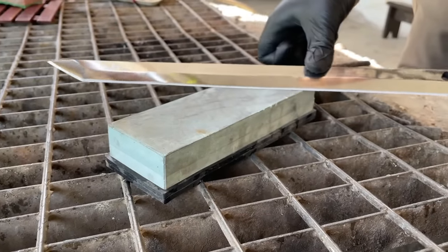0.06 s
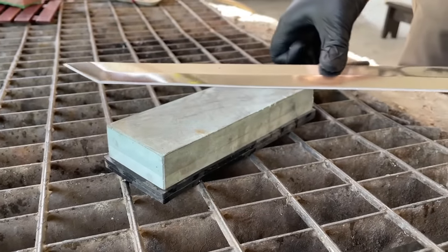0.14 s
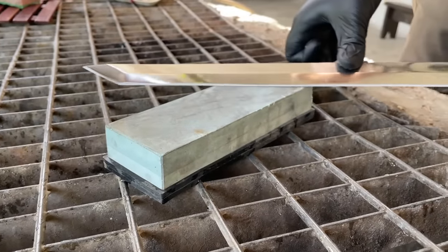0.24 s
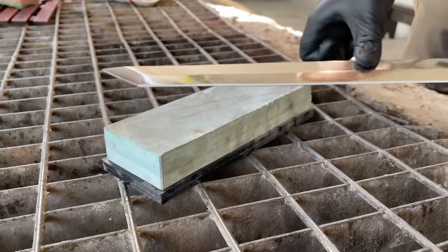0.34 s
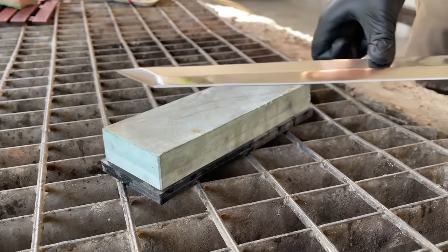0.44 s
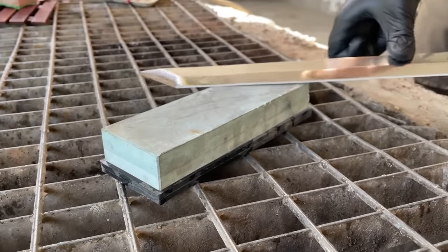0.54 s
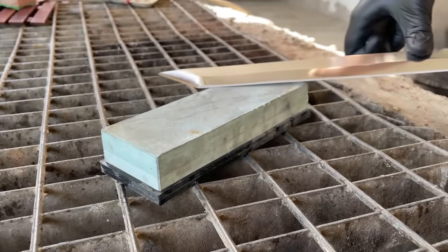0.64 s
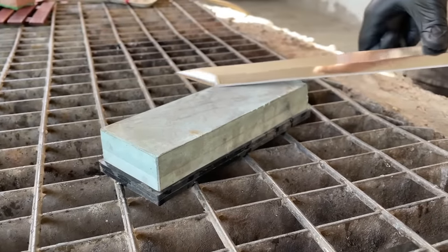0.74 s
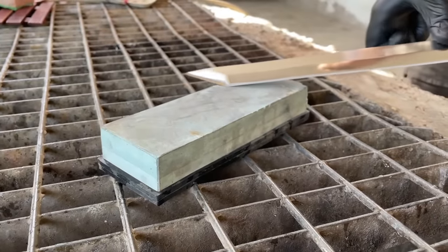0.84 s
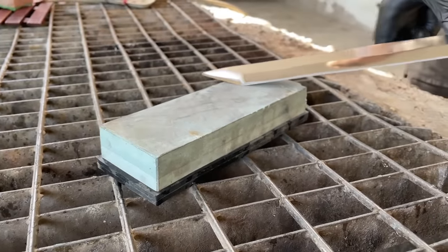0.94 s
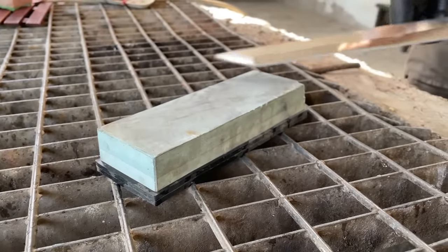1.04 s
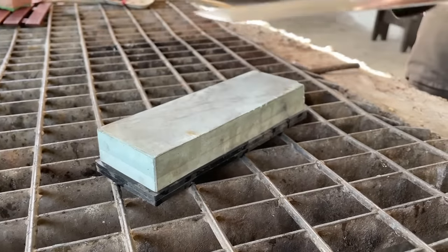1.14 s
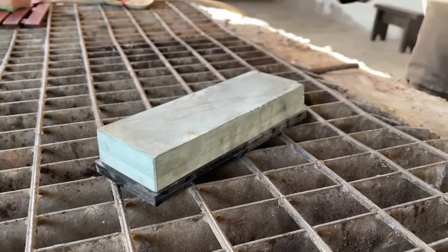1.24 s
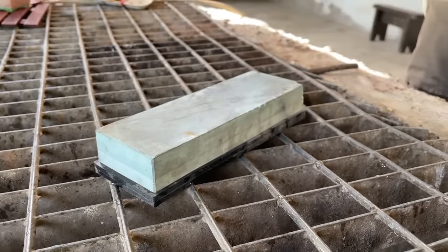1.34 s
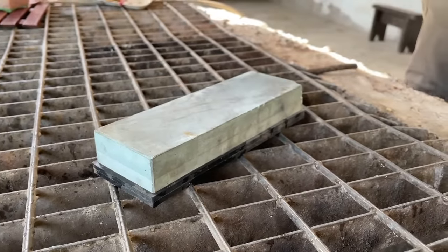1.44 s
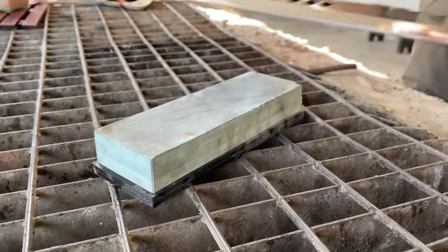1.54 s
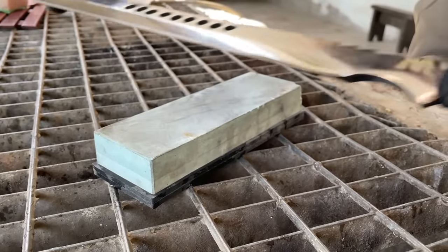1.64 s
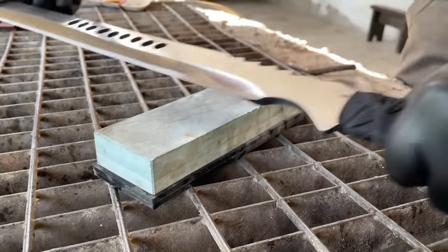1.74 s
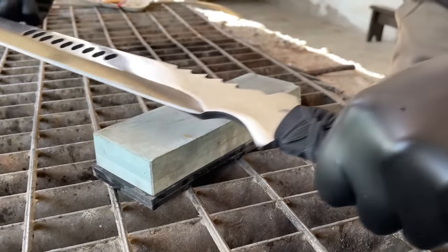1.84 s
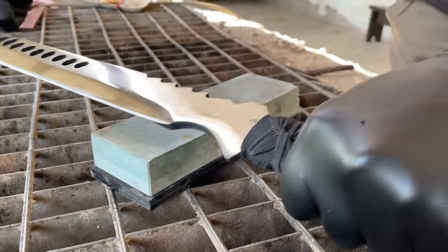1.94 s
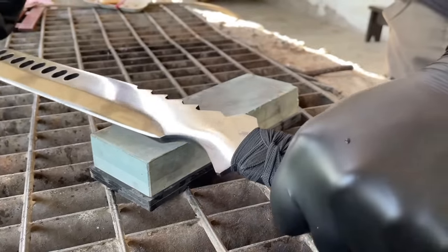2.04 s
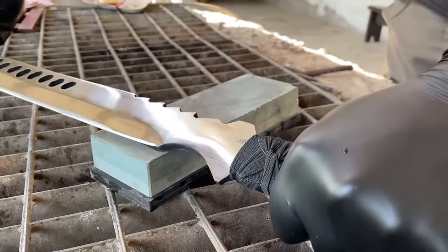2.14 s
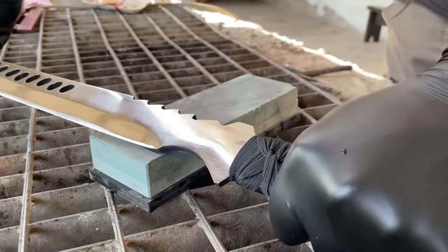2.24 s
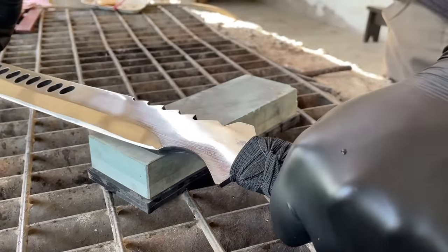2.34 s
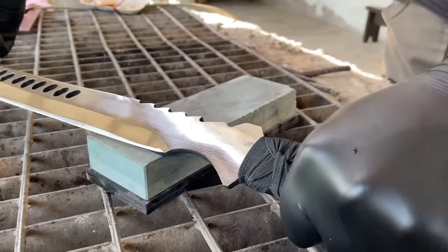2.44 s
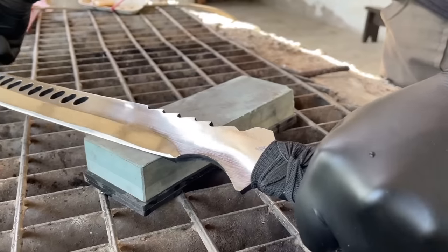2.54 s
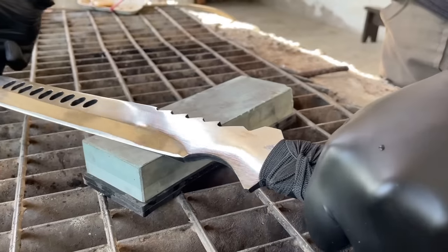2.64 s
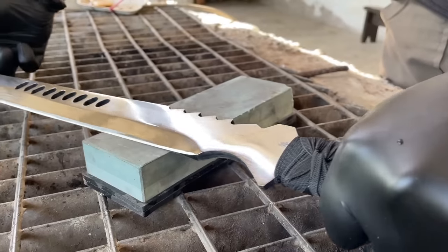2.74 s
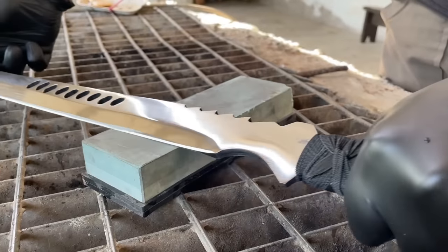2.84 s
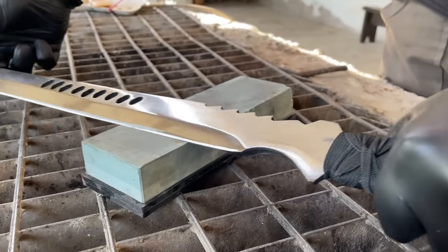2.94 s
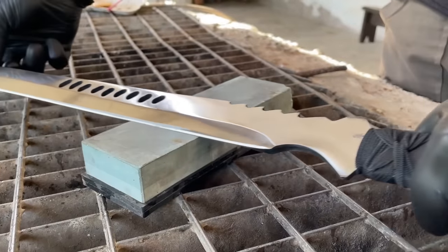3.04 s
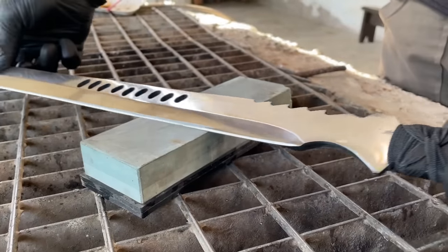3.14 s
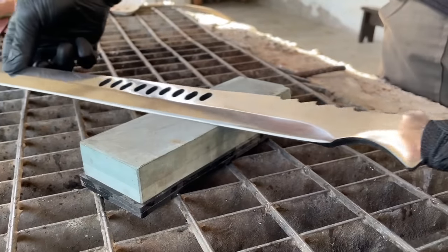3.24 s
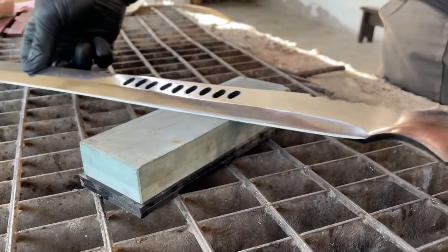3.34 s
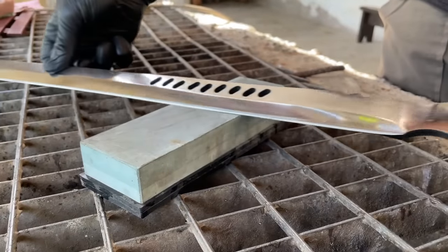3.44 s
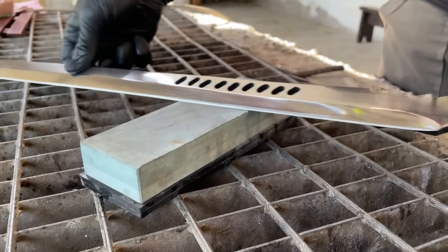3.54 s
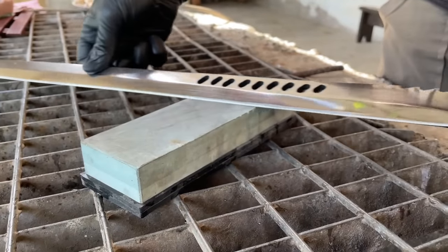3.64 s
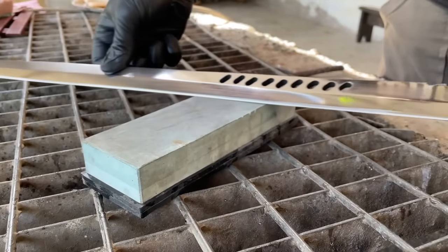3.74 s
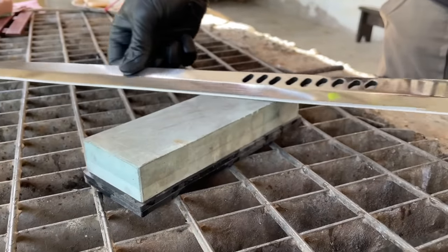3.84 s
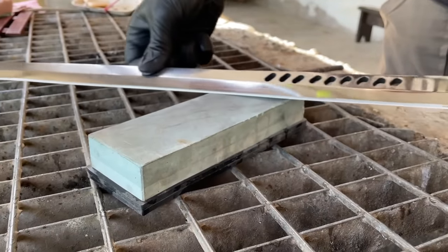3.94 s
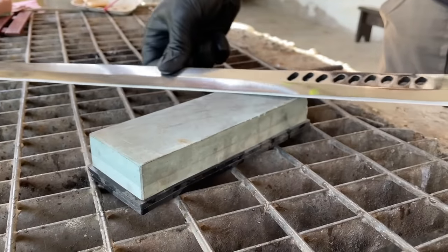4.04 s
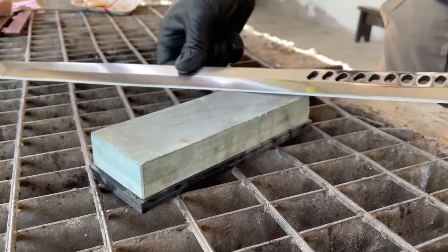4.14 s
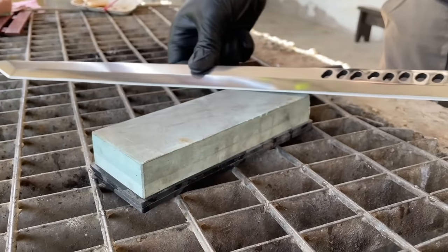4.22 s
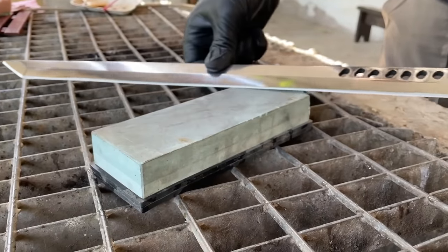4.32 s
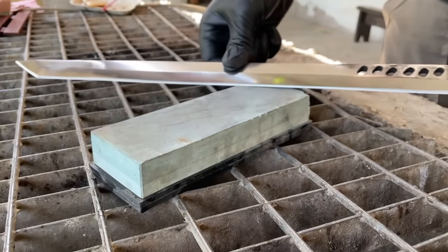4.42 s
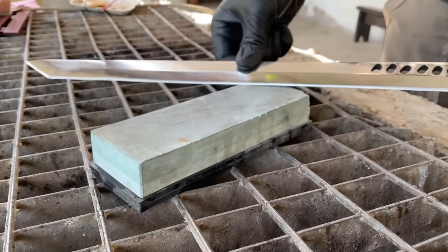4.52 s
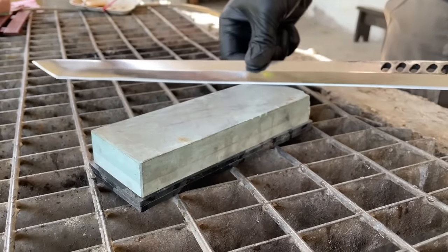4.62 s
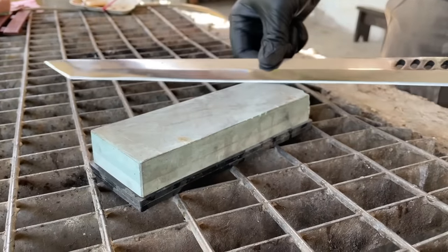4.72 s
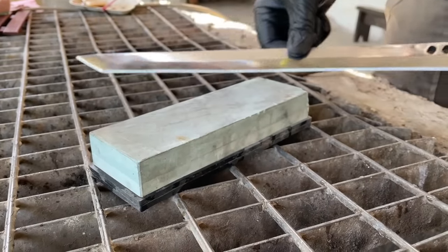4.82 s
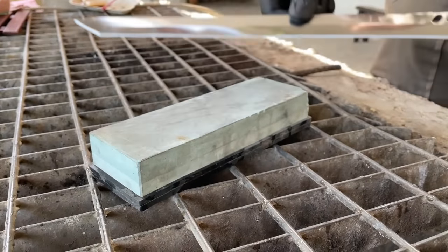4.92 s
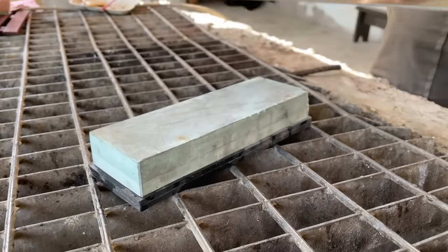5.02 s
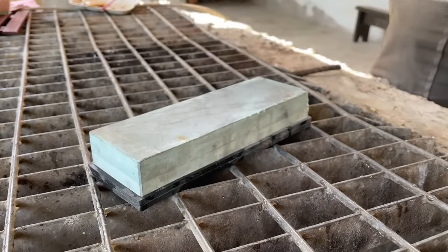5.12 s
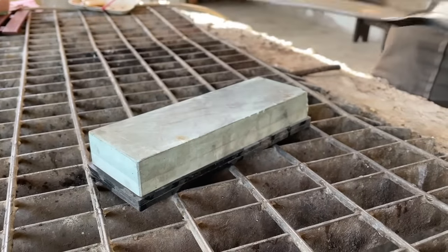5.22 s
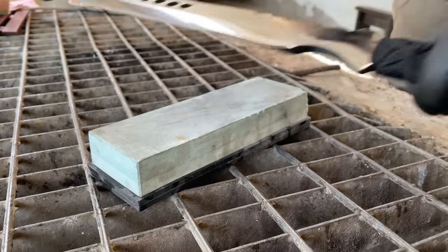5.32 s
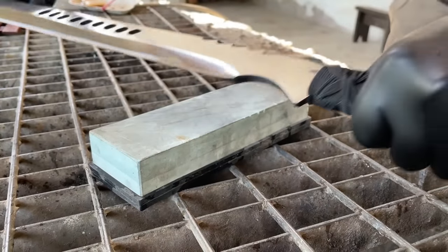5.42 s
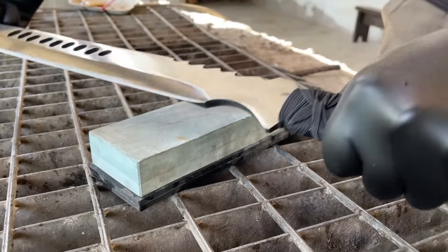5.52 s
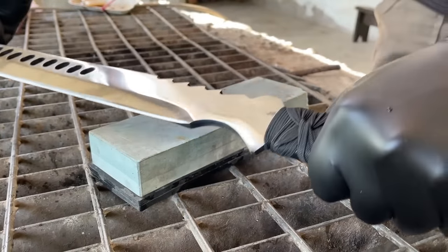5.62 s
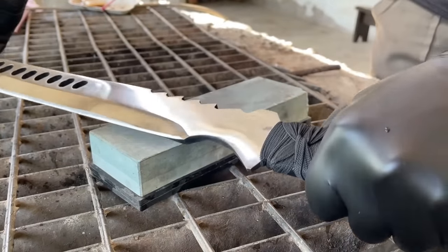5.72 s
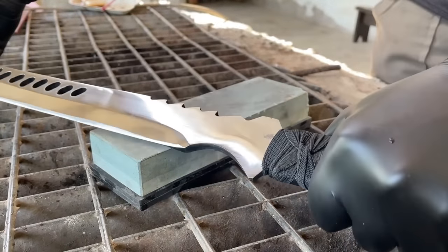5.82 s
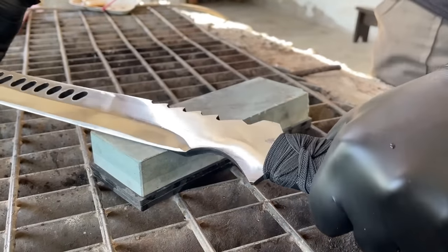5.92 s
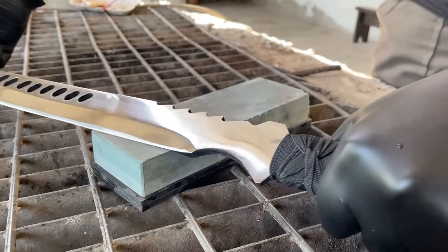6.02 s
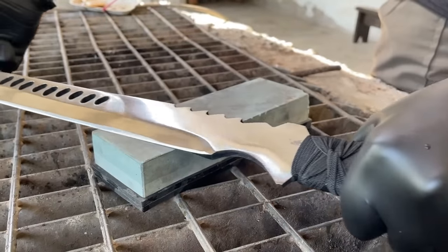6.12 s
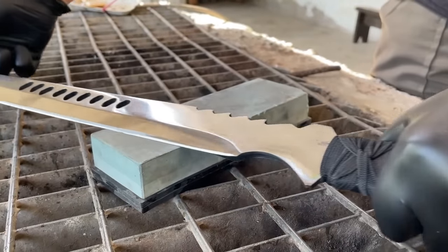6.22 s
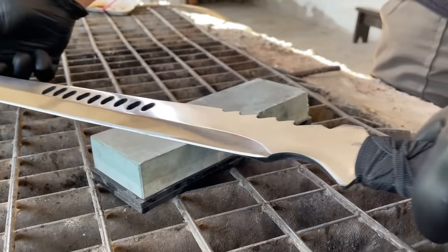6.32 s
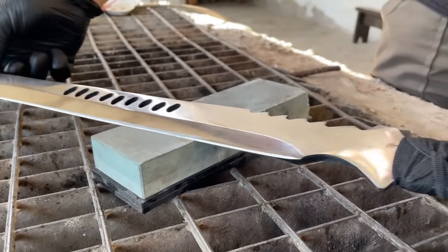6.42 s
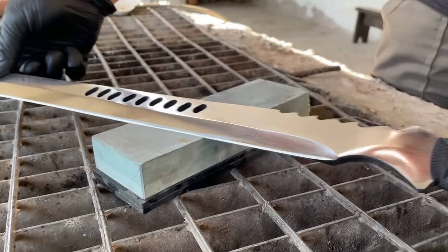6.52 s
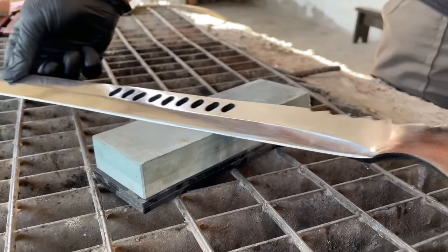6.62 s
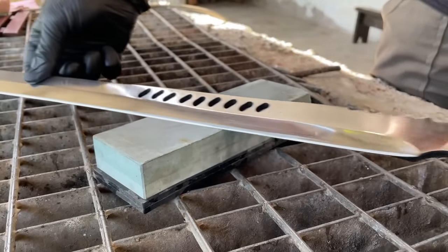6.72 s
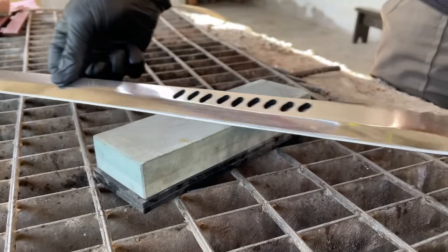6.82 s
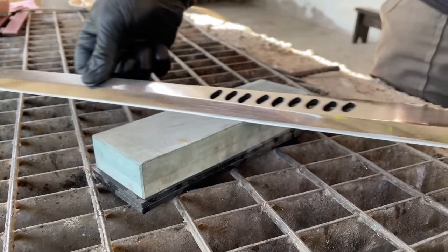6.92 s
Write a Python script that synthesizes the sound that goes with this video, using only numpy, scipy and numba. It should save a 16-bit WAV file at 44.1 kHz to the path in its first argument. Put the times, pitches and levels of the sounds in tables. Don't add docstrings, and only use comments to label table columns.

```python
import sys
import numpy as np
from scipy import signal
from scipy.fft import rfft, irfft, next_fast_len
from scipy.io import wavfile
from scipy.ndimage import uniform_filter1d
from numba import njit

SR = 44100
rng = np.random.default_rng(int(sys.argv[2]) if len(sys.argv) > 2 else 0)


def nominal_scale(level):
    x = np.asarray(level, float) / 20
    return 10 ** x


def pcm_store(signal):
    levels = np.round(np.clip(np.atleast_2d(signal), -1, 1) * 32767)
    wavfile.write(sys.argv[1], SR, levels.astype(np.int16).T)


N = 307377
STEP = 64


def level(x, db):
    return x * nominal_scale(db) / np.sqrt(np.mean(x ** 2))


def on_log(table, hz):
    f, v = np.transpose(table)
    return np.interp(np.log(np.maximum(hz, 1)), np.log(np.maximum(f, 1)), v)


def shape(x, gain):
    size = next_fast_len(x.shape[-1])
    f = np.arange(size // 2 + 1) * SR / size
    return irfft(rfft(x, size) * gain(f), size)[..., :x.shape[-1]]


def cut_below(x, corner_hz, power):
    return shape(x, lambda f: 1 / np.sqrt(1 + (corner_hz / (f + 1)) ** power))


def curves(tables):
    t = np.arange(N) / SR
    s, *columns = np.transpose(np.vstack(tables))
    inside = sum((t >= rows[0][0] - .035) & (t <= rows[-1][0] + .035) for rows in tables) > 0
    gate = uniform_filter1d(1. * inside, 2000, mode="nearest")
    return [np.interp(t, s, c) for c in columns] + [gate]


def walk(rate):
    k = int(SR / STEP / rate)
    held = np.repeat(rng.standard_normal(N // STEP // 8), k)[:N // STEP + 1]
    return 1.48 * uniform_filter1d(uniform_filter1d(held, k), k)


def full(x):
    return np.repeat(x, STEP)[:N]


@njit
def svf(x, hz, width):
    y, b, l = np.empty(len(x)), 0., 0.
    for i in range(len(x)):
        g, k = np.tan(np.pi * hz[i] / SR), width / hz[i]
        v = (b + g * (x[i] - l)) / (1 + g * (g + k))
        b, l, y[i] = 2 * v - b, l + 2 * g * v, k * v
    return y


def narrow(x, hz, width):
    centre = np.full(N, 1. * hz)
    return svf(svf(x, centre, 1. * width), centre, 1. * width)


@njit
def modes(x, hz, width, gain, turn, step):
    out = np.zeros((2, len(x)))
    for m in range(len(width)):
        z, keep = 0j, np.exp(-np.pi * width[m] / SR)
        for i in range(len(x)):
            if i % step == 0:
                p = keep * np.exp(2j * np.pi * hz[m, i // step] / SR)
                g, lead = gain[m, i // step] * np.sqrt(1 - keep), np.exp(.5j * turn[m, i // step])
            z = z * p + g * x[i]
            out[0, i] += (z * lead).imag
            out[1, i] += (z * np.conj(lead)).imag
    return out


def bank():
    # mode_hz [Hz], width_hz [Hz], level_db [dB]
    bending = [(594, 71, -10), (1124, 77, -17), (1355, 36, -8.5), (1513, 35, -13), (1778, 34, -12),
               (1921, 44, -7.5), (2336, 39, -13.5), (2554, 47, -9), (2738, 43, -8.5), (2829, 56, -9.5),
               (3081.5, 60, -2), (3256, 56, 2), (3490, 65.3, -8), (3719, 56, -2), (4084, 63, -5.5),
               (4328, 44, 0), (4764, 100, -5), (5000, 72, 1.5), (5480, 61, -3.5), (5850, 212, 2),
               (6176, 99, -2), (6610, 73, -6), (8180, 200, -7.5), (8950, 220, -8), (9690, 87, -17),
               (10010, 100, -8.5), (10630, 63, -16), (11430, 120, -15), (12200, 48, -24), (12830, 180, -20)]
    hz, width, db = np.transpose(bending)
    chance = rng.standard_normal((3, 3 * len(hz)))
    weak = np.arange(3 * len(hz)) >= len(hz)
    offset = np.repeat([0, -1, 1], len(hz)) * (0.039 + 0.015 * chance[0])
    spread = np.tile(1.74 * hz / (hz + 1500) / (1 + (hz / 5500) ** 4), 3)
    mode_db = np.tile(db, 3) + weak * (-6 + 4.02 * chance[1])
    return np.tile(hz, 3) * (1 + offset), 0.8 * np.tile(width, 3), mode_db, spread * chance[2]


def grit(spread_db):
    return level(rng.standard_normal(N) * nominal_scale(spread_db * rng.exponential(size=N)), 0)


def slide(t):
    # start_s [s], place_cm [cm from the handle], speed_cm_per_s [cm/s]
    strokes = [
        (0, 48, 20),
        (2.2, -7, 20),
        (5.9, -3.5, 26),
    ]
    # low_db [dB], top_db [dB]
    grips = [
        (-17, -7),
        (-12, -6),
        (-11, -5),
    ]
    stroke = np.searchsorted(np.array(strokes)[1:, 0], t)
    start, place, speed = np.array(strokes)[stroke].T
    return (place + speed * (t - start), *np.array(grips)[stroke].T)


def lifted(rows):
    # delay_s [s], change_db [dB]
    lift = [
        (.05, -26),
        (.18, -35),
    ]
    last_s, last_db = rows[-1]
    return rows + [(last_s + s, last_db + db) for s, db in lift]


def contact_swell(hz, place):
    # place_cm [cm], mode_hz [Hz], swell_db [dB],
    # length_cm [cm]
    bellies = [(1.2, 2733, 12.5, 2.5), (3, 2340, 10.5, 4.7), (3.4, 1200, 9.5, 3.6), (3.7, 1367, -6, 4),
               (4.3, 5846, -11, 1.8), (4.5, 1120, 12.5, 7.2), (6, 2534, 12.5, 3.6), (6.9, 4355, 4, 2.8),
               (9.5, 5846, 3.5, 1.5), (10.6, 1769, 4.5, 3), (16, 2800, 10, 4.8), (17.7, 2534, -17.5, 3),
               (21.5, 3480, 9, 4), (23, 4355, -13.5, 2.6), (23.8, 1502, 6.5, 2.4), (27, 1120, 7.5, 2.1),
               (27.4, 5846, 7, 2.5), (35, 1120, -11, 7.3), (38, 3480, -12, 13), (39, 3720, 10, 11),
               (40.45, 1502, 14, 3.1), (40.7, 2970, 14.5, 3), (42, 6000, -9.5, 3.6), (0, 6600, -10, 3),
               (10, 1927, -6.5, 3), (21, 5440, 5.5, 3), (23.5, 1769, -9, 2.2), (31.5, 1502, -10.5, 2.2),
               (36, 1927, 8, 4), (39.3, 2340, 12, 3.3),
               (48.5, 6100, -8, 2.5), (49.7, 4740, 8, 2), (50, 2534, 11, 2.8), (50.5, 2858, 10, 3),
                   (54.3, 4086, 6.5, 2.4), (56.6, 3480, 11.5, 7.1), (59, 2430, -17, 3), (63, 6600, 7, 3),
                   (65.5, 1367, 10, 4), (66, 3281, -7, 2.7), (66.4, 1927, 6.5, 3), (67, 5000, -6.5, 3),
                   (61, 3075, 5, 3)]
    # place_cm [cm], centre_hz [Hz]
    bright = [(0, 2600), (7, 4600), (12, 5600), (20, 4900), (38, 4000), (47, 3700), (48, 2100), (54, 4200),
              (62, 5300)]
    hz, swell_db = hz[:, None], 0
    for cm, mode_hz, db, length in bellies:
        near_place = ((place - cm) / length) ** 2
        near_mode = (np.log(hz / mode_hz) / 0.043) ** 2
        swell_db = swell_db + np.clip(db, -16, 16) * np.exp(-near_place - near_mode)
    octaves = np.log2(hz / np.interp(place, *np.transpose(bright)))
    return swell_db + 1.5 * np.exp(-(octaves / 0.3) ** 2)


def blade(hz, width, db, turn):
    # time_s [s], rasp_db [dB]
    pressure = [
        [(0.0, -44), (0.09, -45), (0.212, -40), (0.41, -45), (0.588, -43.5), (0.608, -41), (0.782, -56),
         (0.926, -44.5), (0.96, -46.5)],
        [(2.53, -42), (2.794, -48), (2.858, -40.5), (3.3, -41), (3.368, -37.5), (3.442, -43), (3.456, -38.5),
         (3.722, -44.5), (3.8, -54.5)],
        [(3.8, -52.5), (4.252, -47), (4.294, -38.5), (4.31, -48), (4.318, -41.5), (4.564, -54), (4.704, -45.5),
         (4.714, -41), (4.745, -44)],
        [(5.95, -75), (6.0, -49.5), (6.072, -42), (6.194, -39), (6.208, -36.5), (6.386, -39), (6.668, -39.5),
         (6.824, -34), (6.97, -38.5)],
    ]
    # time_s [s], rasp_db [dB]
    first_touch = [
        (2.261, -82.5),
        (2.354, -56.5),
        (2.456, -55.5),
        (2.47, -59.5),
    ]
    # frequency_hz [Hz], density_db [dB per Hz]
    rasp_colour = [(300, -30.5), (800, -30), (1400, -21.5), (2200, -5.5), (3200, -4), (5000, -12),
                   (7500, 4.5), (10000, -18), (13000, -16.5), (16000, -3.5)]
    pushes = [lifted(pressure[0]), first_touch, pressure[1], lifted(pressure[2]), pressure[3]]
    rasp_db, gate = curves(pushes)
    place, low_db, top_db = slide(np.arange(N // STEP + 1) * STEP / SR)

    light_db, firm_ref_db = -52.5, -41.5
    firm_db = np.maximum(rasp_db, light_db) - firm_ref_db
    low_db = full(low_db) - 0.7 * firm_db
    top_db = full(top_db) - 0.095 * firm_db

    wander_db = np.array([2.14 * walk(7) + 2.6 * walk(25) for _ in hz])
    pitch = hz[:, None] * (1 + 0.0046 * np.array([walk(4) for _ in hz]))
    sign = (-1.) ** np.arange(len(hz))[:, None]
    gain = nominal_scale(db[:, None] + contact_swell(hz, place) + wander_db) * sign
    turn = turn[:, None] * (1 + 0.84 * np.array([walk(3.014) for _ in hz]))

    drive = grit(2.03) * full(nominal_scale(0.54 * walk(40)))
    hiss = shape(drive, lambda f: nominal_scale(on_log(rasp_colour, f)))
    low_hiss = shape(hiss, lambda f: 1 / (1 + (f / 2200) ** 8))
    top_hiss = shape(hiss, lambda f: 1 / (1 + (7400 / (f + 1)) ** 12))
    middle_hiss = level(hiss - low_hiss - top_hiss, -14.5)

    def ring(k):
        return modes(drive, pitch[k], width[k], gain[k], turn[k], STEP)

    low = ring(hz <= 2200)
    middle = ring((hz > 2200) & (hz <= 7400))
    top = ring(hz > 7400)
    low = cut_below(level(low, -1.5) + level(low_hiss, -12), 950, 6)
    touch = np.clip((rasp_db + 68.5) / 12, 0, 1)
    middle = touch * level(cut_below(middle, 1500, 6), -0.25) + (1 + 2.4 * (1 - touch)) * middle_hiss
    top = level(cut_below(top, 4000, 4), -0.18) + level(top_hiss, 0)
    return gate * nominal_scale(rasp_db - 2.0) * (nominal_scale(low_db) * low + middle + nominal_scale(top_db) * top)


def ports(x):
    # frequency_hz [Hz], left_lead_rad [radians]
    port_phase = [(0, 0), (600, -1.1), (1400, .8), (2300, 0), (3500, 1.1), (4900, 0), (7150, -3.14),
                  (8500, -4.1), (10500, -6.1), (12100, -6.5), (13200, -7.9), (13600, -9.42), (15200, -9.42),
                  (15450, -10.9)]
    # frequency_hz [Hz], left_minus_right_db [dB]
    port_balance = [(60, 0), (110, 1), (200, 0.5), (380, -1.5), (700, -1), (1290, 2), (2380, 4),
                    (4400, 3.5), (8120, -0.5), (15000, 0.5)]

    def half(f):
        lead = np.interp(f, *np.transpose(port_phase))
        return nominal_scale(on_log(port_balance, f) / 2) * np.exp(.5j * lead)

    return np.array([shape(x[0], half), shape(x[1], lambda f: 1 / half(f))])


def room(x):
    t60_s, tail_db = 0.32, -10.5
    t = np.arange(SR // 2) / SR
    tail = rng.standard_normal((2, len(t))) * np.exp(-np.log(1000) * t / t60_s) * (t > .004)
    tail = shape(tail, lambda f: 1 / (1 + (f / 7000) ** 4))
    tail = tail * nominal_scale(tail_db) / np.sqrt(np.sum(tail[0] ** 2))
    return signal.fftconvolve(x[None], tail, axes=1)[:, :N]


def air():
    # frequency_hz [Hz], density_db [dB per Hz]
    air_colour = [(21, -31), (36, -12), (65, -2.5), (113, -15.5), (146, -22.5), (179, -19), (366, -32),
                  (405, -25), (448, -29.5), (484, -30.5), (806, -37.5), (2740, -47), (15900, -64)]
    # frequency_hz [Hz], correlation [-1 to 1]
    likeness = [(60, 0.98), (130, 0.81), (290, 0.73), (640, 0.63), (1410, 0.027), (3100, 0.52),
                (6820, -0.14), (15000, 0.08)]
    # time_s [s], swell_db [dB]
    air_swell = [(0, 1.5), (1.002, 3), (2, 2), (3, 7), (4, 1), (5, -0.5), (6, -1), (7, 0)]

    def alike(f):
        return np.clip(on_log(likeness, f), -1, 1)

    noise = rng.standard_normal((2, N))
    mid = shape(noise[0], lambda f: nominal_scale(on_log(air_colour, f)) * np.sqrt(1 + alike(f)))
    side = shape(noise[1], lambda f: nominal_scale(on_log(air_colour, f)) * np.sqrt(1 - alike(f)))
    swell_db = np.interp(np.arange(N) / SR, *np.transpose(air_swell)) + 0.76 * full(walk(3.7))
    return level(np.array([mid + side, mid - side]), -60.5) * nominal_scale(swell_db)


def engine(table):
    hz, db, gate = curves([table])
    phase = 2 * np.pi * np.cumsum(hz) / SR
    tone = np.sin(phase) + nominal_scale(-30.5) * np.sin(2 * phase)
    return gate * nominal_scale(db + 1.0 + 1.5 * full(walk(7.7))) * tone


def engines():
    # time_s [s], firing_hz [Hz], level_db [dB]
    car = [(0.0, 87, -48.5), (0.108, 85.6, -61), (0.714, 93, -50.5), (0.922, 94.9, -59),
           (1.022, 101.5, -52.5), (1.136, 105, -48.5), (1.362, 111.5, -63.5), (1.5, 112.3, -65)]
    # time_s [s], firing_hz [Hz], level_db [dB]
    truck_pulls = [(0.6, 47.9, -69), (0.82, 48.15, -55.5), (1.61, 57.93, -46), (1.94, 60.9, -51),
                   (2.2, 65.3, -57.5), (2.47, 67.9, -40), (3.04, 73.8, -41), (3.11, 76.3, -49),
                   (3.4, 78, -55.5)]
    # time_s [s], firing_hz [Hz], level_db [dB]
    truck_slows = [(3.49, 75, -52.5), (3.7, 70.46, -51.5), (3.77, 67.9, -41), (3.888, 63, -57.5),
                   (4.04, 55.2, -41.5), (4.16, 50.1, -49), (4.24, 47.1, -64), (4.3, 44.9, -52.5),
                   (4.48, 42.5, -72)]
    # time_s [s], firing_hz [Hz], level_db [dB]
    van = [(3.7, 83.5, -57), (3.91, 85.5, -50), (4.08, 87.2, -63), (5.03, 83.5, -64.5), (5.56, 89.5, -56.5),
           (6.03, 88.35, -73.5), (6.202, 96.3, -76), (6.71, 98.1, -62), (6.97, 96.4, -71)]
    # time_s [s], firing_hz [Hz], level_db [dB]
    idler = [(4.5, 46.18, -65), (4.71, 52.07, -58.5), (4.83, 43.6, -79), (5.43, 43.73, -63),
             (5.59, 47.58, -58.5), (6.69, 49.54, -59.5), (6.76, 51.24, -75.5), (6.97, 51, -42)]
    return sum(engine(table) for table in (car, truck_pulls, truck_slows, van, idler))


def gloves():
    rustles = [
        (1.076, -70, 10060, 3500, 0.013),
        (1.306, -75.5, 3960, 4530, 0.083),
        (1.4, -74.5, 9900, 5000, 0.04),
        (1.41, -86, 4520, 3000, .04),
        (5.24, -80.5, 6480, 5000, 0.064),
        (5.315, -76, 3700, 5500, 0.068),
        (5.62, -79, 4900, 1504, 0.089),
        (5.65, -86, 9500, 2000, .04),
    ]
    rise_s = .006
    out, t = np.zeros(N), np.arange(N) / SR
    rub = grit(2.1) * full(nominal_scale(4.9 * walk(30)))
    for s, db, hz, width, fall in rustles:
        band = level(narrow(rub, hz, width), db)
        out += band * np.exp(-((t - s) / np.where(t < s, rise_s, fall)) ** 2)
    return out


def taps(hz, width, db, turn):
    touches = [(1.307, -69, 3708, 1.2, 0.031), (2.1717, -55.5, 938.6, 1.5, 0.017),
               (2.276, -66.5, 4520, 1.1, 0.013), (2.481, -50.5, 3410, 1.1, 0.0093),
               (2.5055, -31, 2678, 0.77, 0.0097), (2.506, -38.5, 1790, 0.51, 0.021),
               (2.506, -52.5, 660, 0.5, .005), (2.172, -64, 10290, 0.54, 0.01195),
               (5.9075, -53.5, 1019, 1.77, 0.023), (5.911, -55.5, 1770, 0.031, 0.0062),
               (5.909, -66, 3130, 0.19, 0.012)]
    out, span = np.zeros((2, N)), SR // 5
    t = np.arange(span) / SR
    for s, tap_db, centre_hz, spread, chatter in touches:
        push = rng.standard_normal(span) * (np.exp(-t / chatter) + 3 * np.exp(-t / 0.00045))
        gain = nominal_scale(0.36 * db - 11 * (np.log2(hz / centre_hz) / spread) ** 2)
        sound = modes(push, hz[:, None], 0.82 * width, gain[:, None], turn[:, None], span)
        start = int(s * SR)
        out[:, start:start + span] += sound * nominal_scale(tap_db + 8.0) / np.max(np.abs(sound))
    return out


def knocks():
    bumps = [(1.368, -72, 720, 0.055, 0.71), (1.865, -73, 494, 0.031, 0.34),
             (3.841, -59.5, 109, 0.36, 0.81), (4.745, -69.5, 922, 0.21, 0.054),
             (5.639, -69, 594, 0.064, 0.47), (5.648, -55.5, 642, 0.059, 0.27), (5.655, -58, 252, 0.12, 1),
             (5.69, -75, 610, 0.088, 0.31), (6.858, -60, 175, 0.43, 0.16), (2.172, -65.5, 650, .08, 0.78),
             (5.909, -65, 650, .08, 0.73), (5.65, -65.5, 890, 0.051, 0.34)]
    out, t = np.zeros(N), np.arange(N) / SR
    for s, db, hz, t60, share in bumps:
        age = np.maximum(t - s, 0)
        onset = 1 - np.exp(-age / 0.0018)
        burst = rng.standard_normal(N) * onset * np.exp(-np.log(1000) * age / t60)
        thud = narrow(burst, hz, share * hz)
        out += nominal_scale(db + 6.0) * thud / np.max(np.abs(thud))
    return out


def scene():
    steel = bank()
    near = blade(*steel) + gloves() + taps(*steel) + knocks()
    hum = engines() * nominal_scale(np.array([[1.5], [-1.5]]))
    return nominal_scale(4.0) * ports(near) + room(near[0]) + hum + air()


def roll_off(x):
    return signal.sosfilt(signal.butter(12, 16020, fs=SR, output="sos"), x)


def record(dry):
    # frequency_hz [Hz], gain_db [dB]
    mic = [(25, -10), (38, 0), (11000, 0.5), (12500, -2), (15750, -3.5), (15850, -43)]
    mix = shape(dry, lambda f: nominal_scale(on_log(mic, f)))
    return roll_off(mix)


dry = scene()
out = record(dry)
pcm_store(out)
```